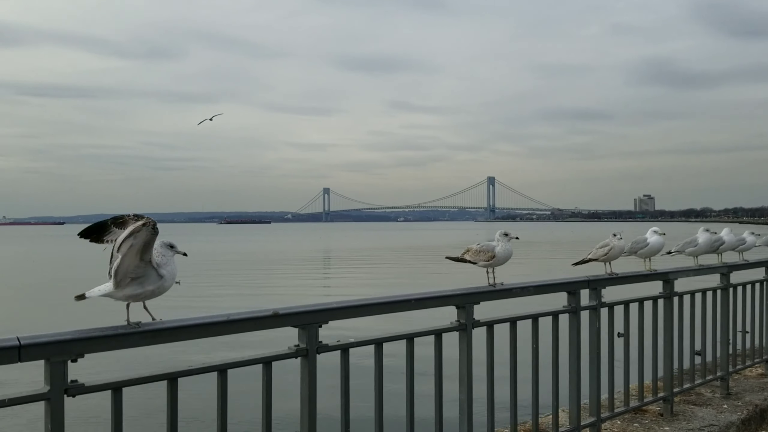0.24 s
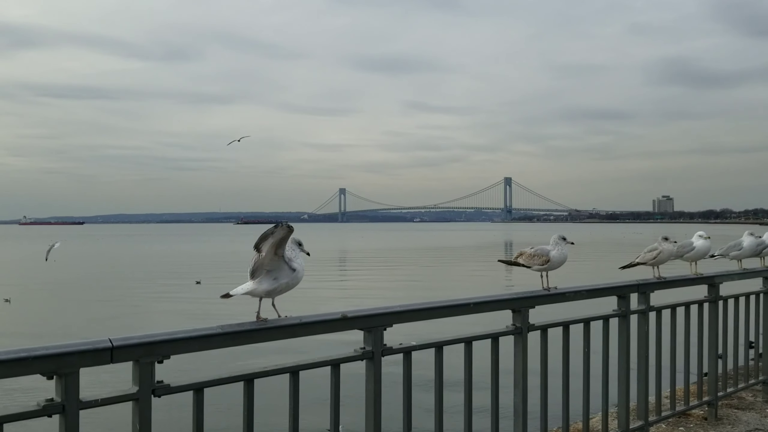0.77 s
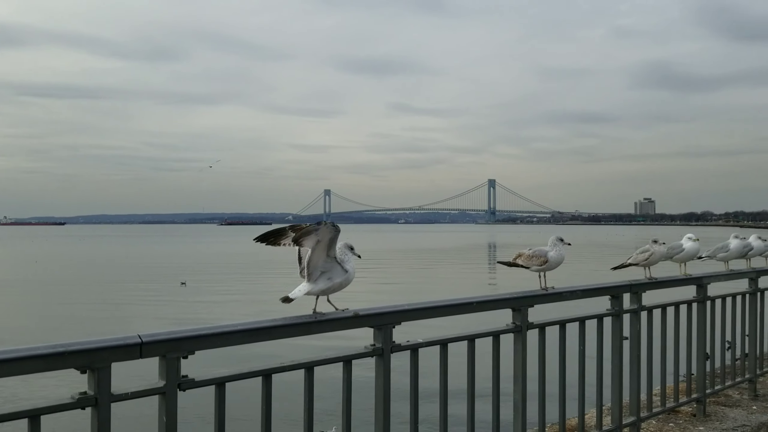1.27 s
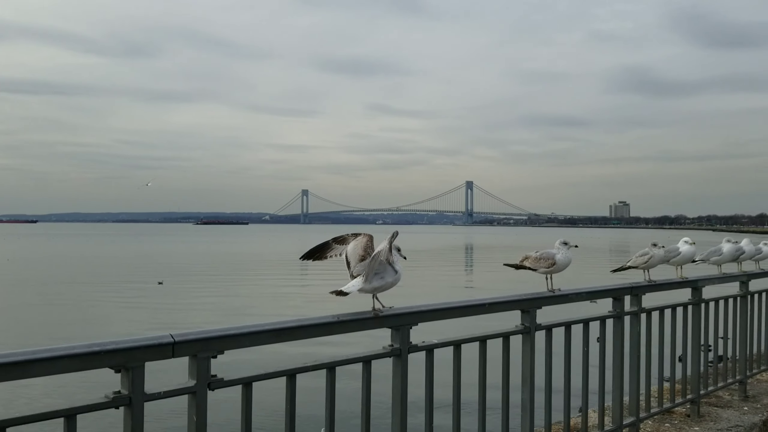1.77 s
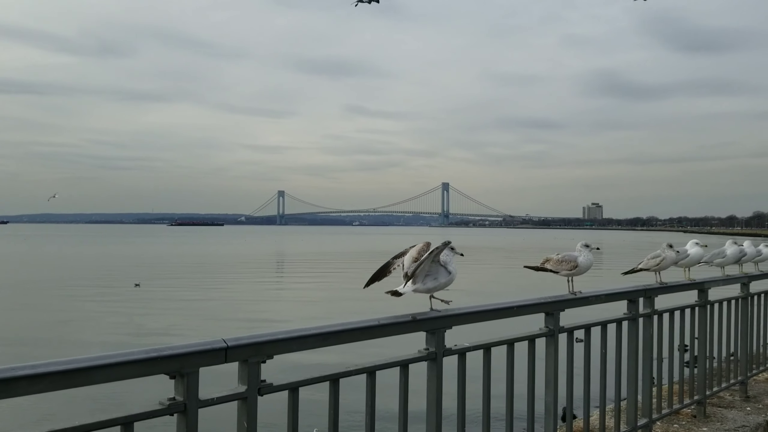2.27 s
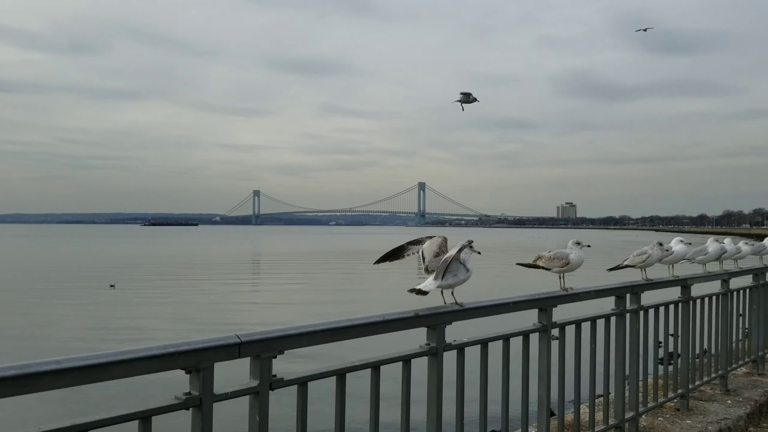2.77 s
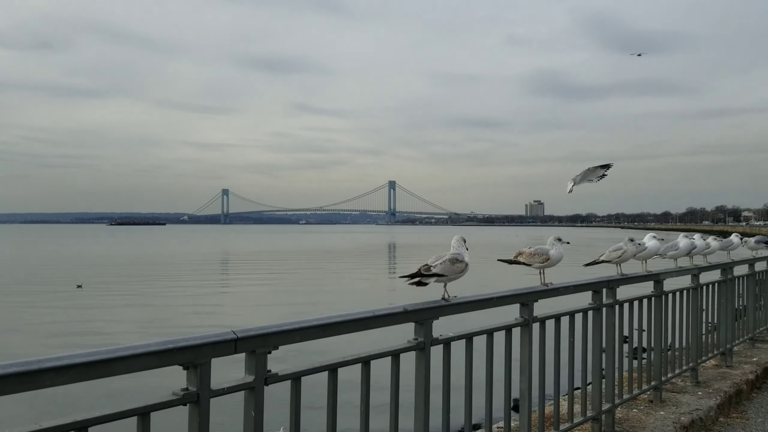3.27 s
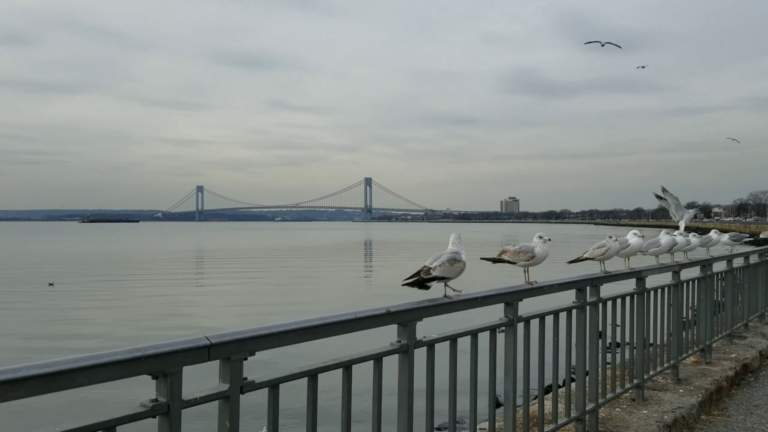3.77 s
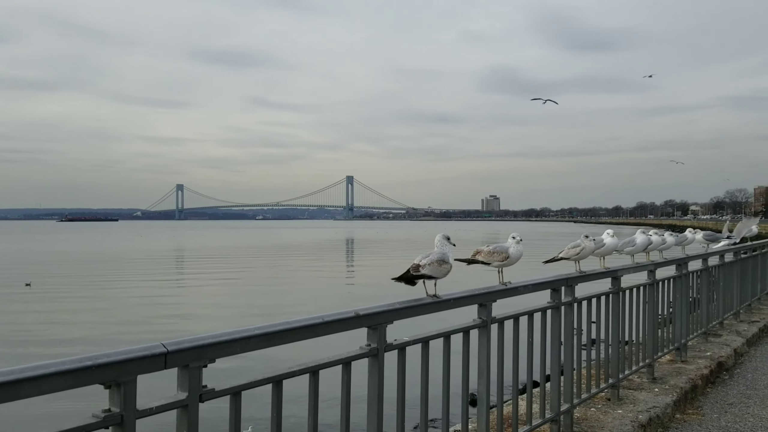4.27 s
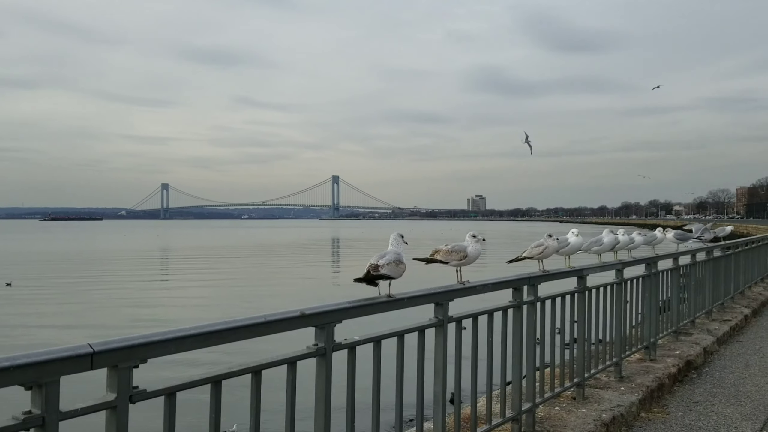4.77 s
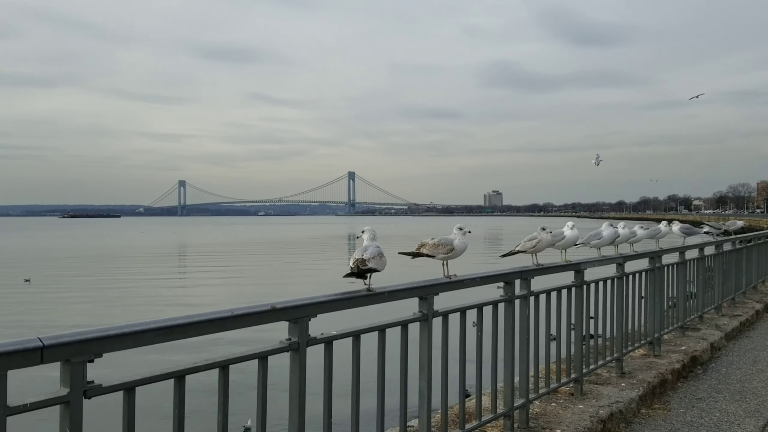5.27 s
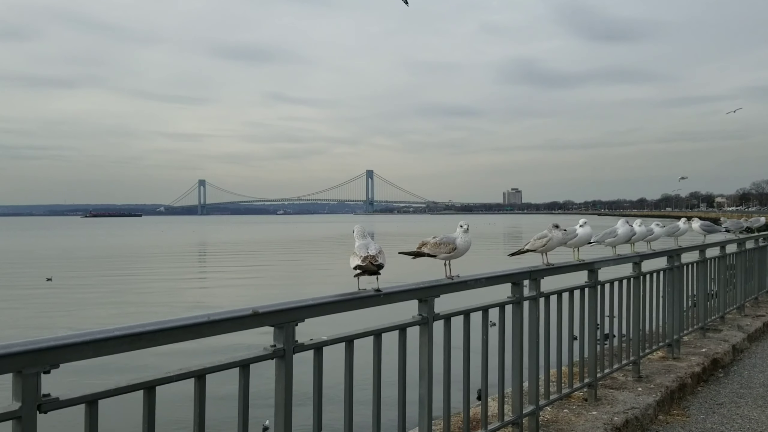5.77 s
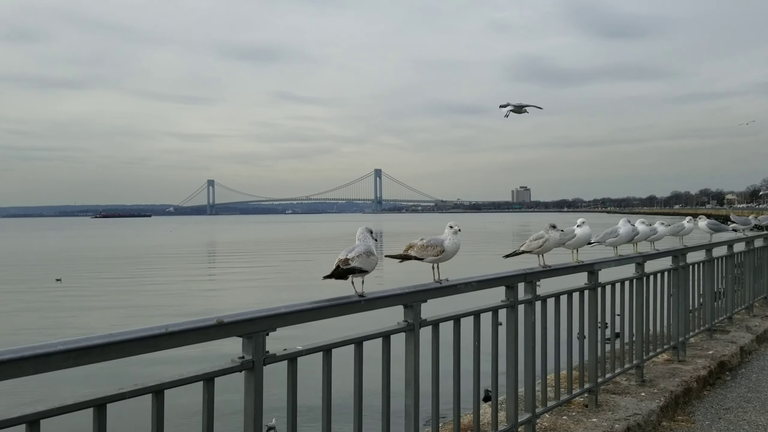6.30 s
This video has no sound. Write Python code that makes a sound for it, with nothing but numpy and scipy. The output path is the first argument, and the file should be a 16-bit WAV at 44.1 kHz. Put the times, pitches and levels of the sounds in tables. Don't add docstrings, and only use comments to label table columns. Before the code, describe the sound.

Over a soft far-off rumble, gulls give short hoarse cries and a sharp two-toned squeal, then thin distant whistling calls and fluttering wings.

```python
import sys
import numpy as np
from scipy import signal
from scipy.fft import rfft, irfft, next_fast_len
from scipy.io import wavfile

SR = 44100
rng = np.random.default_rng(int(sys.argv[2]) if len(sys.argv) > 2 else 0)


def boost_factor(decibels):
    exponent = np.asarray(decibels, float) / 20
    return 10 ** exponent


def bounce(signal):
    frames = np.transpose(np.atleast_2d(signal))
    limited = np.clip(frames, -1, 1)
    pcm = np.round(limited * 32767).astype(np.int16)
    wavfile.write(sys.argv[1], SR, pcm)


N = 288414
T = np.arange(N) / SR
SIDES = np.array([[.5], [-.5]])


def at_hz(points, hz):
    points_hz, points_db = np.transpose(points)
    return np.interp(np.log(hz), np.log(points_hz), points_db)


def drift(rate_hz, count=N):
    r = np.exp(-2 * np.pi * rate_hz / SR)
    slow = signal.lfilter([1], [1, -2 * r, r * r], rng.standard_normal(count + 8000))[8000:]
    return slow / np.std(slow)


def in_time(parts, t=T):
    gate = 0
    for part in parts:
        inside_s = np.minimum(t - part[0][0], part[-1][0] - t)
        gate = gate + np.clip(inside_s / 0.0032 + 1, 0, 1)
    s, *columns = np.transpose(np.vstack(parts))
    return [np.interp(t, s, c) for c in columns] + [np.minimum(gate, 1)]


def span(start_s, end_s):
    return slice(max(round(start_s * SR), 0), min(round(end_s * SR), N))


def turns(hz, lag_ms):
    return 2 * np.pi * (np.cumsum(hz) / SR - SIDES * hz * lag_ms / 1000)


def harmonics(db, beak_db, third_db, third_share):
    return db, db + beak_db, db + third_db + third_share * beak_db


def hoarse_air(count, near_db, wide_db):
    return 1 + boost_factor(near_db) * drift(240, count) + boost_factor(wide_db) * drift(1800, count)


def far_noise(spectrum):
    # hz, share_0_to_1
    alike_points = [(60, 0.98), (140, 0.96), (250, 0.78), (500, 0.75), (1000, 0.71), (2000, 0.69),
                    (3200, 0), (6000, 0)]
    lag_ms, lag_from_hz = 0.44, 360
    size = next_fast_len(N)
    hz = np.maximum(np.arange(size // 2 + 1) * SR / size, 1)
    shared, left, right = rfft(rng.standard_normal((3, size)))
    alike = np.clip(at_hz(alike_points, hz), 0, 1)
    lag = 2 * np.pi * hz * lag_ms / 1000 / (1 + (lag_from_hz / hz) ** 4)
    sides = np.sqrt(alike) * shared * np.exp(-1j * SIDES * lag)
    sides = sides + np.sqrt(1 - alike) * np.array([left, right])
    x = irfft(sides * boost_factor(at_hz(spectrum, hz)), size)[:, :N]
    return x / np.std(x)


def traffic():
    # time_s, level_db
    flow = [(0, 1.5), (1.2, 1.1), (1.7, 0.84), (3.5, -0.5), (4.9, 0.5), (5.8, 0.3), (6.54, 1)]
    # hz, density_db_per_hz
    engines = [(11, -49), (18, -9.5), (35, -16.5), (47, -1.5), (122, -1), (199, -4.5), (306, -10.5),
               (362, -12), (449, -17.5), (500, -19.5), (700, -28.5), (910, -63.5), (1540, -120)]
    # hz, density_db_per_hz
    tyres = [(240, -39), (400, -8), (537, -9), (727, -3), (1080, -4.5), (1330, -7.5), (1700, -9),
             (2450, -19.5), (2680, -25), (4500, -46), (5850, -80), (9900, -120)]
    flow_db, _ = in_time([flow])
    rumble = boost_factor(-37.5 + 0.07 * flow_db - 0.45 * SIDES) * far_noise(engines)
    road = boost_factor(-52 + flow_db + 4.0 - 1.6 * SIDES) * far_noise(tyres)
    return rumble + road


def bustle():
    # time_s, level_db
    stir = [(0, -51.5), (.18, -65.5), (.35, -73), (.6, -64), (.9, -71), (1.23, -64.5), (1.5, -73.5),
            (1.8, -73), (2.5, -67.5), (3.3, -72), (3.86, -68.5), (4.2, -72.5), (4.9, -67.5), (5.15, -74),
            (5.8, -75), (6.54, -73.5)]
    # hz, density_db_per_hz
    haze = [(1470, -11.5), (2500, -11.5), (4770, -16.5), (5510, -19.5), (7520, -21), (8500, -17),
            (10200, -19.5), (13100, -13.5), (15400, -20.5)]
    stir_db, _ = in_time([stir])
    return boost_factor(stir_db + 3.5 + drift(3.0) + 1.25 * SIDES) * far_noise(haze)


def croak_shape(start, length, db, swell, hz, glide, breath_first, breath_last, tilt_first, tilt_last):
    attack_s, attack_db, release_db_per_s, silent_db = 0.007, 20, 701, -85
    end_db = db + swell * (length - attack_s)
    release_s = max((end_db - silent_db) / release_db_per_s, .004)
    steps = [(0, db - attack_db), (attack_s, db), (length, end_db), (length + release_s, silent_db)]
    rows = []
    for s, level_db in steps:
        share = min(s / length, 1)
        breath = breath_first + (breath_last - breath_first) * share
        tilt = tilt_first + (tilt_last - tilt_first) * share
        rows.append((start + s, level_db, hz + glide * s, breath, tilt))
    return rows


def croaks(lag_ms=.48, pan_db=-2.0):
    # start_s, length_s, level_db, swell_db_per_s, pulse_rate_hz
    calls = [(-.02, 0.11, -55.5, 30.5, 1186), (0.396, 0.12, -53, -50.5, 318),
             (0.753, 0.058, -52.5, -90.5, 327.3), (0.976, 0.066, -52, -36, 309.3),
             (1.014, 0.063, -62.5, 28.5, 335), (1.056, 0.013, -59, 3, 316), (1.089, .08, -59, -24.5, 1018),
             (1.696, 0.057, -59, 98.5, 300), (3.54, 0.17, -90, 8, 457), (6.333, .21, -76, 5, 420)]
    # glide_hz_per_s, breath_first, breath_last (0-1), tilt_first, tilt_last (db_per_octave)
    manners = [(-780, 0.66, 0.62, -7.5, -3.5), (541, 0.56, 0.5, 0.5, 3.5), (-400, 0.53, 0.45, 4, -3.5),
               (70, 0.45, 0.24, -8.5, -3.5), (293, 0.12, 0.41, -8, 3), (3, 0.51, 0.56, 1, -11),
               (-300, 0.4, 0.52, 1, -10), (3, 0.8, 0.88, 0.1, 0.1), (399, 0.31, .55, 10, 8),
               (0, 0.81, 0.83, 0.1, 0.1)]
    # hz, width_hz, level_db
    throats = [
        [(1250, 400, -4.5), (2300, 320, -7), (3420, 1040, -3), (4800, 700, -7), (5870, 770, -4),
         (7900, 1400, -0.5)],
        [(1810, 560, 5.5), (2950, 1100, -2.5), (4100, 450, -9), (4900, 490, -3), (7450, 530, -8),
         (8800, 670, -6.5), (13500, 2200, -16.5)],
        [(1770, 260, 0), (2840, 750, -4), (3970, 490, -13), (5220, 810, 2.5), (6250, 770, -0.5),
         (7160, 1900, -2)],
        [(4400, 310, 2), (3750, 400, -12), (5650, 680, -18)],
        [(1790, 540, 4), (3000, 860, -1.5), (4430, 1300, -12), (6950, 1000, -0.5), (8380, 680, -5.5),
         (12900, 2040, -6)],
        [(1920, 190, 2), (2700, 340, -5), (3520, 890, -7.5), (5030, 370, -15), (7400, 760, -8), (8400, 700, -9)],
    ]
    throat_of = [0, 1, 4, 5, 2, 1, 2, 3, 2, 3]
    out, late = np.zeros((2, N)), round(lag_ms * SR / 1000)
    for k, (call, manner) in enumerate(zip(calls, manners)):
        rows = croak_shape(*call, *manner)
        at = span(rows[0][0] - .01, rows[-1][0] + 0.0074)
        db, hz, breath, tilt, gate = in_time([rows], T[at])
        count, breath = len(hz), np.clip(breath, 0, 1)
        cycles = np.cumsum(hz * (1 + .03 * breath * drift(163, count))) / SR
        pulses = sum(np.cos(2 * np.pi * h * cycles) * (h * hz < 12000) for h in range(1, 36))
        pulses = pulses * np.sqrt(hz / 6000)
        uneven = 1 + breath * np.cos(np.pi * cycles + drift(33, count))
        noise = rng.standard_normal((3, count))
        puffs = (1 + np.cos(2 * np.pi * cycles)) * boost_factor(3.8 * drift(57, count))
        source = (1 - breath) * pulses * uneven + .35 * breath * (noise[0] + noise[1:]) * puffs
        voice = 0
        for j, (peak_hz, width_hz, peak_db) in enumerate(throats[throat_of[k]]):
            r = np.exp(-np.pi * width_hz / SR)
            b = [(1 - r * r) / 2, 0, (r * r - 1) / 2]
            a = [1, -2 * r * np.cos(2 * np.pi * peak_hz / SR), r * r]
            ring = signal.lfilter(b, a, signal.lfilter(b, a, source))
            voice = voice + (-1) ** j * ring * boost_factor(peak_db + tilt * np.log2(peak_hz / 4000))
        voice = 6.53 * voice * gate * boost_factor(db + pan_db * SIDES)
        if k < 7:
            voice[0] = np.roll(voice[0], late)
        out[:, at] += voice
    return out


def shriek(lag_ms=0.458, pan_db=-5.5):
    # time_s, pitch_hz, level_db, beak_opening_db (2nd harmonic over 1st)
    voices = [
        [(-.01, 3520, -61, 7), (.016, 3530, -63, 16.5), (.036, 3480, -63, 11), (.054, 3370, -56, 4),
         (.074, 3400, -50, -8), (.09, 3330, -70, -6)],
        [(-.01, 4150, -59, 16), (.018, 4160, -62.5, 8.5), (.036, 4060, -68, 3), (.07, 3880, -72, 9),
         (.095, 3760, -76, 10), (.125, 3600, -80, 13)],
    ]
    at, voice = span(0, .14), 0
    for part in voices:
        hz, db, beak_db, gate = in_time([part], T[at])
        phase = turns(hz + 8.6 * drift(120, len(hz)), lag_ms)
        tone = np.sin(phase) + boost_factor(beak_db) * np.sin(2 * phase)
        voice = voice + gate * boost_factor(db) * tone * hoarse_air(len(hz), near_db=-15.0, wide_db=-24.0)
    out = np.zeros((2, N))
    out[:, at] = np.sqrt(2) * voice * boost_factor(pan_db * SIDES)
    return out


def feathers(pan_db=3.0):
    # start_s, peak_db, length_s
    shakes = [(0.007, -52, 0.057), (0.05, -52, 0.13), (0.413, -51, 0.06), (1.075, -55, 0.042),
              (1.075, -56, 0.04), (1.0894, -60.5, 0.08), (1.283, -66, 0.054), (1.738, -55, 0.11),
              (1.946, -59, 0.069), (3.0294, -61, 0.07), (3.34, -55.5, 0.057), (3.855, -62, 0.05),
              (3.964, -56, 0.062), (4.043, -58, 0.045), (4.124, -58, 0.074), (4.228, -55, 0.075),
              (4.32, -59, 0.052), (4.4278, -62, 0.055), (4.525, -57, 0.062), (4.6304, -54, 0.061),
              (4.8494, -69, 0.07), (4.994, -59, 0.046), (0.44, -60, 0.09), (1.12, -62, 0.07),
              (0.77, -58, 0.06)]
    # start_s, peak_db
    snaps = [(1.0639, -44), (1.927, -57), (2.1399, -60.5), (3.85, -58), (3.9934, -57), (4.0366, -55),
             (4.2197, -58)]
    # hz, density_db_per_hz
    rustle = [(2500, -7), (4000, -1.5), (7000, -8.5), (9000, 0), (12500, 2.5), (15000, -3)]
    snap_t60_s = .16
    swell = np.zeros(N)
    for s, db, length_s in shakes:
        at = span(s - .01, s + length_s)
        swell[at] += boost_factor(db - 12.0) * np.hanning(at.stop - at.start) ** 0.39
    for s, db in snaps:
        at = span(s, s + snap_t60_s)
        swell[at] += boost_factor(db - 11.0 - 60 * (T[at] - s) / snap_t60_s)
    return swell * boost_factor(3.1 * drift(150) + pan_db * SIDES) * far_noise(rustle)


def whistle_shape(start, length, first_hz, last_hz, crest_db, crest, fall_db):
    crest = np.clip(crest, .03, .97)
    rise_db = 4 * min(3 * crest, 1)
    crest_hz = first_hz + crest * (last_hz - first_hz)
    return [(start, first_hz, crest_db - rise_db), (start + crest * length, crest_hz, crest_db),
            (start + length, last_hz, crest_db - fall_db)]


def whistles():
    # start_s, length_s, first_hz, last_hz, left_lag_ms
    calls = [(.1, .025, 4460, 4445, -.32), (.125, .098, 4445, 4370, -.32), (.223, .064, 4365, 4295, -.32),
             (.287, .03, 4230, 4110, -.32), (.32, .05, 4370, 4100, -.32), (1.085, .225, 2480, 2405, 0),
             (1.792, .088, 4405, 4380, 0), (1.88, .1, 4365, 4140, 0), (2.01, .093, 4205, 4160, 0),
             (2.59, .13, 4330, 4110, .29), (2.72, .23, 4060, 3980, .29), (2.69, .14, 4370, 4510, .29),
             (3.065, .135, 4030, 4130, -.45), (3.2, .06, 4150, 3960, -.45), (4.74, .12, 3580, 3390, 0),
             (4.343, .035, 3960, 4130, 0), (4.525, .062, 2975, 2870, -.38), (4.58, .16, 4020, 3680, 0),
             (4.73, .13, 3870, 4260, 0), (4.83, .1, 4300, 4350, 0), (4.76, .09, 5420, 5410, 0),
             (5.02, .15, 3960, 3760, 0), (6.265, .115, 4670, 4900, .2), (6.368, .062, 3610, 3650, .25),
             (6.43, .11, 4510, 4320, .25), (6.25, .25, 1228, 1195, .2), (2.385, .065, 3050, 2970, -.45),
             (4.44, .07, 4480, 4460, 0), (1.74, .055, 3170, 3330, 0), (.085, .045, 8570, 8330, .45),
             (.03, .06, 4880, 4740, -.32), (1.31, .19, 2405, 2235, 0), (.452, .018, 4960, 5040, .45),
             (.035, .045, 6000, 5800, .45), (.085, .12, 6760, 6600, -.32), (.09, .04, 4190, 4110, -.32),
             (.968, .024, 2350, 2850, .45)]
    # crest_db, crest_share_of_length, end_fall_db, second_harmonic_db, left_over_right_db
    voices = [(-76, .8, 0, -40, 10), (-56.5, 0.7, 10, -40, 11.5), (-51.5, 0.8, 2, -45, 7),
              (-66, .3, 6, -40, -1), (-78, .2, 6, -40, 1.5), (-64, 0.58, 0.5, -15, 1),
              (-63.5, .1, 8, -26, -1), (-73, .05, 9, -14, 2), (-80.5, 0.72, 2, -10, -4),
              (-69, 0.61, 6, -24, 0), (-76, .05, 2, -26, 3), (-66.5, 0.31, 8, -16, -1),
              (-69.5, 0.9, 2, -16, -6), (-70, .05, 4, -16, 0), (-81, .3, 3, -29, -8),
              (-73, .4, 6, -27, -2.1), (-63, 0.73, 6, -11, -4), (-76.5, 0.13, 1, -29, -7),
              (-80, 0.4, 1.6, -29, 1), (-80, .2, 4, -29, 7), (-81.5, .13, 9, -30, -5),
              (-86, 0.27, 10, -30, -8), (-77.5, 0.55, 1, -30, -1), (-69.5, 0.68, -8, -35, 3),
              (-76, .1, 3, -32, -6), (-67.5, 0.2, -6, -28, -5), (-66, 0.97, -1, -29, 2),
              (-81, .45, 9, -30, -2), (-76, 0.87, 1, -30, -3), (-67, .6, 4, -40, -4),
              (-63, 0.67, 0, -30, 11), (-66.5, .05, 1, -18.5, 1), (-60, .5, 2, -20, -3),
              (-63, .6, 3, -30, -3), (-74, .3, 9, -30, 5), (-66, .5, 3, -30, 5), (-63, 0.51, 3, -27, -2)]
    out = np.zeros((2, N))
    for k, ((*glide, lag_ms), voice) in enumerate(zip(calls, voices)):
        crest_db, crest, fall_db, second_db, pan_db = voice
        half_db, breath_db = (-12, -17) if k < 5 else (-42.5, -19.0)
        rows = whistle_shape(*glide, crest_db, crest, fall_db)
        hoarse = 0.11 + .011 * max(-58 - crest_db, 0)
        at = span(rows[0][0] - .01, rows[-1][0] + 0.0103)
        t = T[at]
        hz, db, gate = in_time([rows], t)
        count = len(hz)
        gate = gate * np.clip(np.minimum(t - t[0], t[-1] - t) / (.12 * hoarse), 0, 1)
        phase = turns(hz + 93.0 * hoarse * drift(140, count), lag_ms)
        waver = boost_factor(9.7 * hoarse * np.array([drift(22, count), drift(22.5, count)]))
        tone = np.sin(phase) + boost_factor(second_db) * np.sin(2 * phase)
        tone = tone + boost_factor(half_db) * (np.sin(phase / 2) + 0.089 * np.sin(3 * phase / 2))
        tone = tone * hoarse_air(count, near_db=-14.0, wide_db=breath_db)
        out[:, at] += np.sqrt(2) * gate * boost_factor(db + 6.5 + pan_db * SIDES) * waver * tone
    return out


def whine(lag_ms=0.467, pan_db=-4.0):
    # time_s, pitch_hz, level_db, beak_opening_db
    main_rows = [
        [(.472, 4080, -66, -12), (.48, 4100, -63, -12), (.5, 4160, -56, -9), (.518, 4220, -57, -7),
         (.527, 4330, -68, -12)],
        [(.535, 4180, -50, -2), (.55, 4240, -50.5, 2), (.58, 4270, -50.5, -1.5), (.62, 4300, -52, 3.5),
         (.665, 4245, -48, -1.5), (.7, 4170, -55.5, 10.5), (.745, 4100, -47, -3), (.768, 4100, -56, -6),
         (.79, 4020, -72, -4)],
    ]
    # time_s, pitch_hz, level_db, side_lines_db
    low_rows = [
        [(.47, 3000, -66, -64), (.5, 3060, -49, -53), (.52, 3110, -39.5, -57), (.533, 3090, -70, -57),
         (.6, 3090, -72, -56), (.66, 3120, -64, -64), (.72, 3000, -61, -71), (.74, 3000, -59, -55),
         (.777, 3090, -54, -61), (.805, 2960, -78, -75)],
    ]
    # main_halves, second_halves, level_db,
    # follows (0 second voice, 1 side lines, 2 third harmonic)
    products = [(0, 2, 0.0, 0), (2, 2, -9.0, 0), (3, -1, 0.0, 1), (3, 1, -5.0, 1), (5, 1, -5.0, 2),
                (7, -1, -4.0, 2), (1, 1, -13.0, 1)]
    doubling_s, doubling_edge_s = (0.575, 0.71), .02
    at = span(0.46, .83)
    t = T[at]
    count = len(t)
    main_hz, *main_db, main_on = in_time(main_rows, t)
    low_hz, low_db, side_db, low_on = in_time(low_rows, t)
    first_db, second_db, third_db = harmonics(*main_db, third_db=-8, third_share=0.44)
    doubled = np.minimum(t - doubling_s[0], doubling_s[1] - t) / doubling_edge_s
    doubled = np.clip(doubled, .15, 1)
    main, low = (turns(hz / 2 + 3.9 * drift(120, count), lag_ms) for hz in (main_hz, low_hz))
    third_db = third_db + np.clip(6.0 * drift(24, count), -15, 1.5) - 12.0 * (t < .53)
    voice = 0
    for k, db in enumerate((first_db, second_db, third_db)):
        voice = voice + main_on * boost_factor(db) * np.sin(2 * (k + 1) * main)
    halves = boost_factor(-3.0) * np.sin(main) + boost_factor(-17.0) * np.sin(3 * main)
    voice += main_on * doubled * boost_factor(first_db) * halves
    for m, n, db, follows in products:
        leader_db = (low_db, side_db, third_db)[follows]
        voice += low_on * boost_factor(db + leader_db) * np.sin(m * main + n * low)
    voice = voice * hoarse_air(count, near_db=-28.0, wide_db=-23.0)
    out = np.zeros((2, N))
    out[:, at] = np.sqrt(2) * voice * boost_factor(-0.15 + pan_db * SIDES)
    return out


def squeal(lag_ms=-.456, pan_db=5.5):
    # time_s, pitch_hz, level_db, beak_opening_db
    high_rows = [
        [(2.286, 4750, -45.5, -3), (2.29, 4810, -41, -1.5), (2.3, 4900, -36, -2), (2.318, 4950, -34, -8),
         (2.322, 4950, -55, -21), (2.34, 4800, -64, -17)],
        [(2.373, 4900, -44, -9), (2.386, 4850, -39.5, -10), (2.396, 4750, -44, -15), (2.41, 4620, -35.5, -12.5),
         (2.44, 4574, -36.5, -11), (2.47, 4410, -45.5, -2.5), (2.5, 4520, -39.5, -8), (2.53, 4460, -46, -17),
         (2.585, 4390, -66, -20)],
    ]
    # time_s, pitch_hz, level_db, beak_opening_db
    low_rows = [
        [(2.287, 3940, -58, -13), (2.3, 3850, -58.5, -20), (2.314, 4100, -46, -29), (2.322, 4045, -32.5, 1.5),
         (2.338, 4115, -31.5, -1.5), (2.36, 4132, -31, -12), (2.372, 4090, -34, -23), (2.378, 3970, -45.5, -8),
         (2.4, 3860, -62, -11)],
    ]
    half_lines = [(0.5, -18.5), (1.501, -14.5), (2.501, -15)]
    flutter_depth = (.2, .55, .6)
    at = span(2.26, 2.62)
    t = T[at]
    count, long_note = len(t), t > 2.36
    high_hz, *high_db, high_on = in_time(high_rows, t)
    low_hz, *low_db, low_on = in_time(low_rows, t)
    high_db = list(harmonics(*high_db, third_db=-21.5, third_share=.1))
    low_db = harmonics(*low_db, third_db=-15.5, third_share=0.11)
    opens_s, opens_db_per_s = (2.39, 2.52), 120
    opened = np.clip(t, *opens_s) - np.mean(opens_s)
    high_db[2] = high_db[2] + np.where(long_note, opens_db_per_s * opened, 3.0)
    high, low = (turns(hz + 16.0 * drift(120, count), lag_ms) for hz in (high_hz, low_hz))
    beat = np.sin(2 * np.pi * np.cumsum(180.0 + 20.0 * drift(21, count)) / SR)
    flutter = [1 + depth * beat for depth in flutter_depth]
    shred = .45 * np.clip((2.41 - t) / .03, .1, 1)
    rasp = (1, 1, 1 - shred + shred * drift(170, count))
    voice = 0
    for k in range(3):
        high_line = high_on * boost_factor(high_db[k]) * np.sin((k + 1) * high)
        low_line = low_on * flutter[k] * boost_factor(low_db[k]) * np.sin((k + 1) * low)
        voice = voice + rasp[k] * (high_line + low_line)
    both = high_on * low_on * boost_factor((high_db[1] + low_db[1]) / 2 + 2.0)
    sums = boost_factor(np.where(t > 2.323, -3.0, 5.0)) * np.sin(high + low)
    sums += boost_factor(5.0) * long_note * np.sin(2 * high - low)
    upper_sums = np.sin(2 * high + low) + long_note * np.sin(high + 2 * low)
    sums += boost_factor(np.where(long_note, -4.0, -14.0)) * upper_sums
    voice += both * sums
    for multiple, db in half_lines:
        voice += low_on * flutter[1] * boost_factor(low_db[1] + db) * np.sin(multiple * low)
    high_halves = boost_factor(-33.5) * np.sin(3 * high / 2) + boost_factor(-30.0) * np.sin(5 * high / 2)
    voice += high_on * boost_factor(high_db[0]) * high_halves
    voice = voice * hoarse_air(count, near_db=-45.0, wide_db=-25.0)
    out = np.zeros((2, N))
    out[:, at] = np.sqrt(2) * voice * boost_factor(0.5 + pan_db * SIDES)
    return out


def waterfront(x):
    # delay_s, level_db
    echoes = [
        (.013, -14),
        (.052, -28),
    ]
    scatter_t60_s, scatter_db = 0.33, -7
    dull, out = signal.lfilter([.6], [1, -.4], x), np.zeros_like(x)
    for k, (s, db) in enumerate(echoes):
        lag = round(s * SR)
        out[:, lag:] += boost_factor(db) * dull[::(-1) ** k, :-lag]
    tail = rng.standard_normal((2, SR // 3)) * boost_factor(-60 * T[:SR // 3] / scatter_t60_s)
    tail /= np.sqrt(np.sum(tail ** 2, axis=1, keepdims=True))
    return out + boost_factor(scatter_db) * signal.fftconvolve(dull, tail, axes=1)[:, :N]


def scene():
    near = squeal()
    gulls = croaks() + shriek() + whistles() + whine() + near
    echoes = waterfront(gulls - .55 * near)
    return traffic() + bustle() + gulls + feathers() + echoes


def roll_off(x):
    return signal.sosfilt(signal.butter(12, 15520, fs=SR, output="sos"), x)


def record(dry):
    return roll_off(dry)


dry = scene()
out = record(dry)
bounce(out)
```